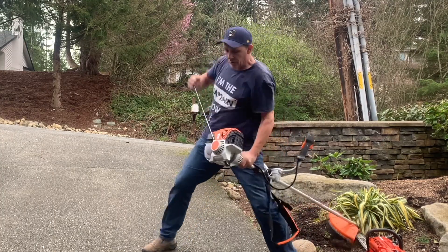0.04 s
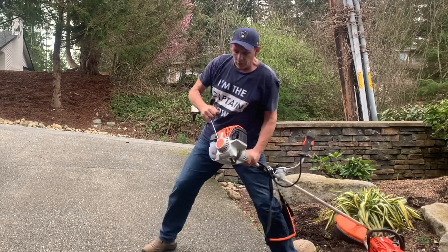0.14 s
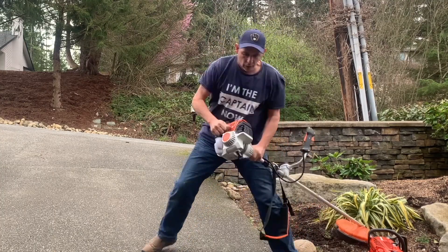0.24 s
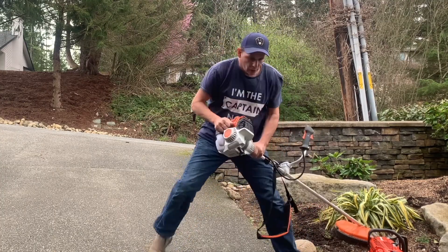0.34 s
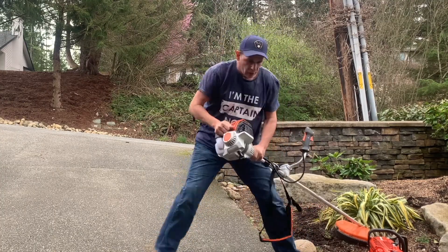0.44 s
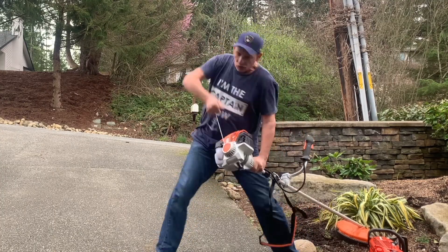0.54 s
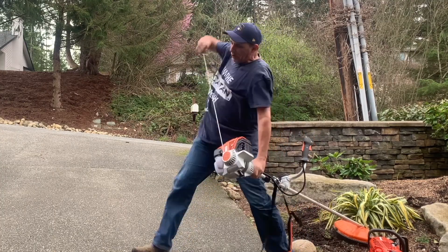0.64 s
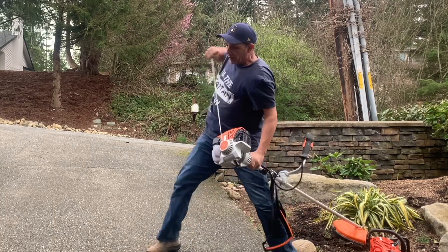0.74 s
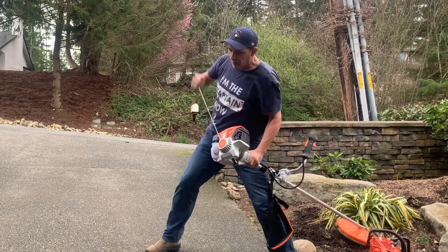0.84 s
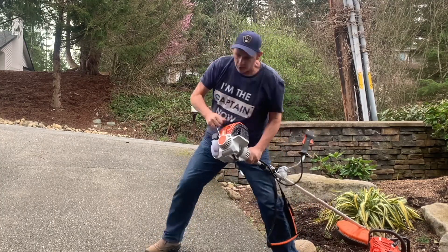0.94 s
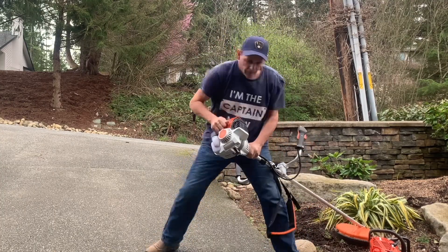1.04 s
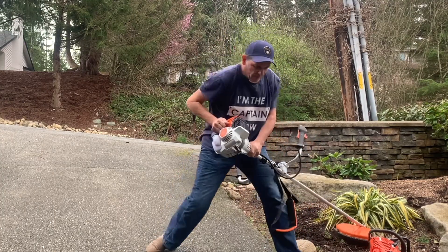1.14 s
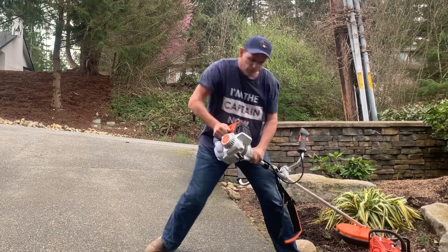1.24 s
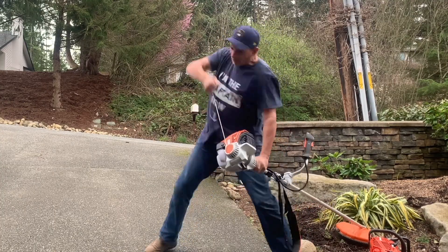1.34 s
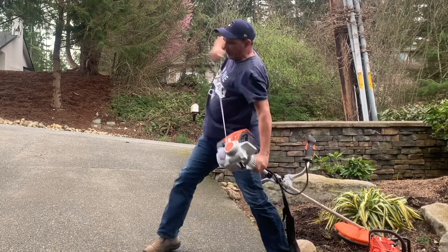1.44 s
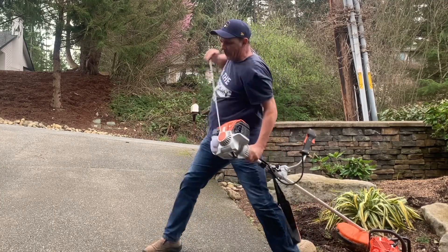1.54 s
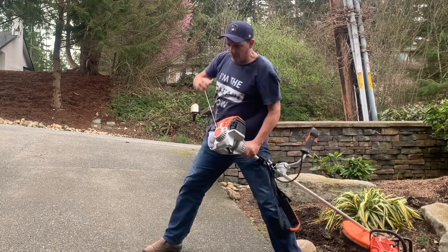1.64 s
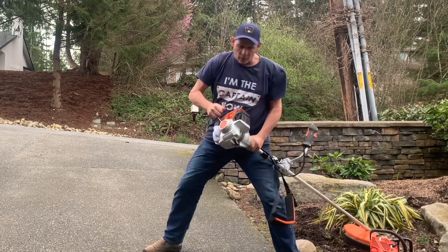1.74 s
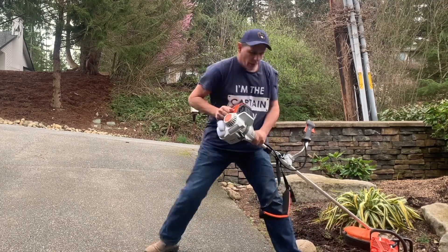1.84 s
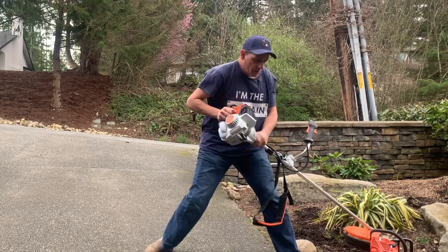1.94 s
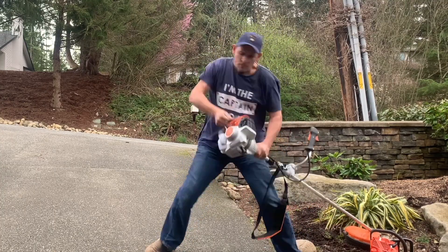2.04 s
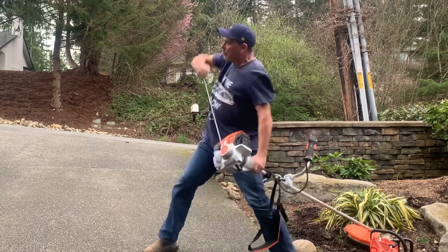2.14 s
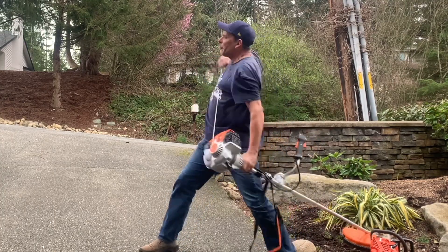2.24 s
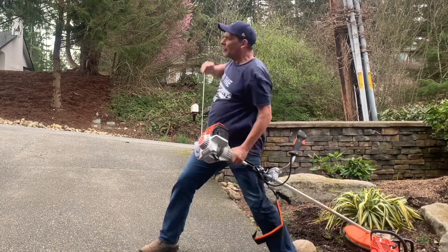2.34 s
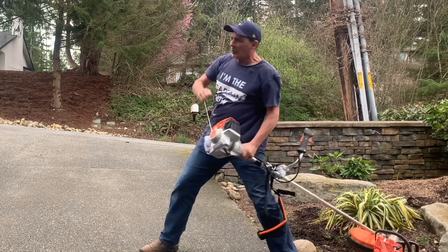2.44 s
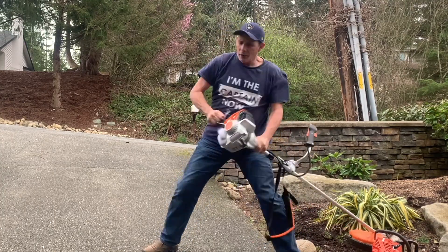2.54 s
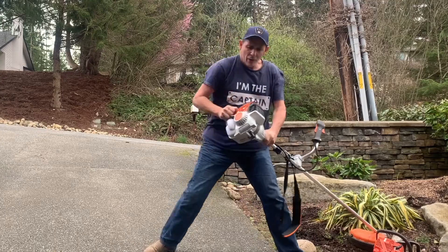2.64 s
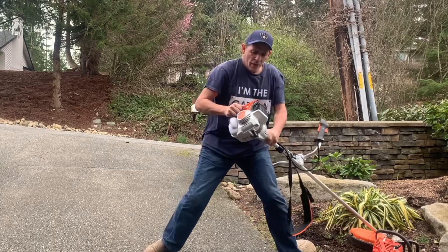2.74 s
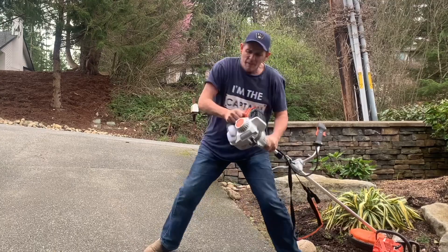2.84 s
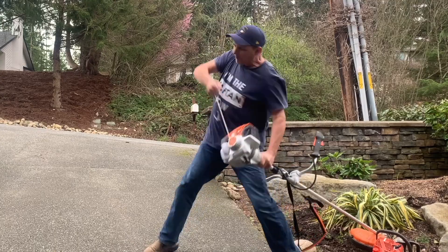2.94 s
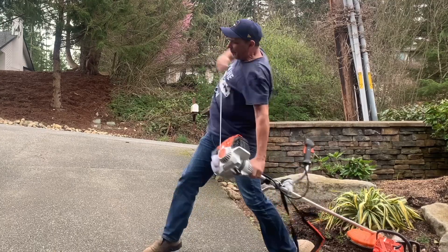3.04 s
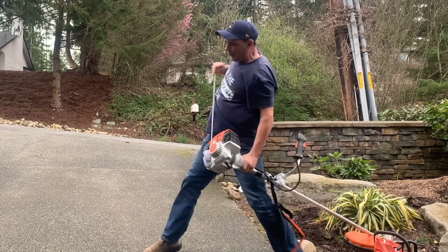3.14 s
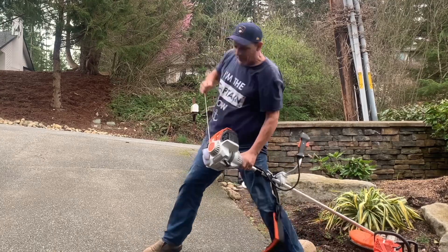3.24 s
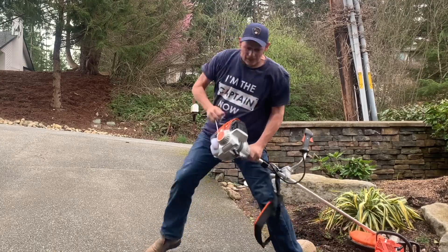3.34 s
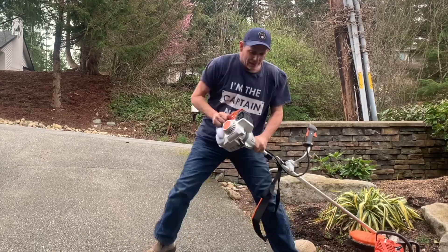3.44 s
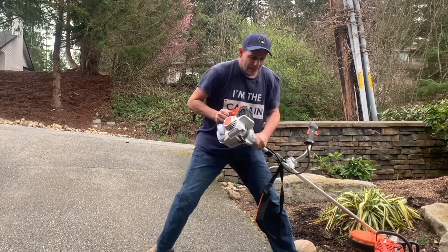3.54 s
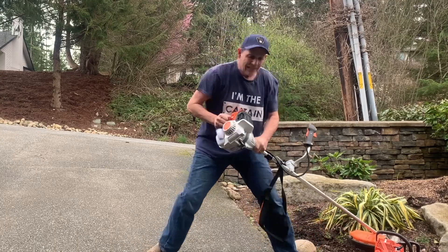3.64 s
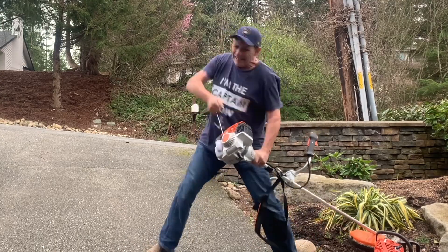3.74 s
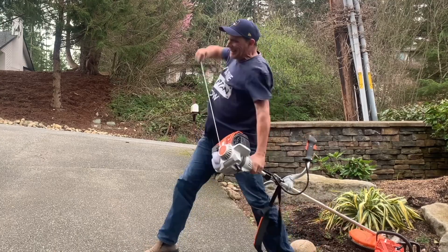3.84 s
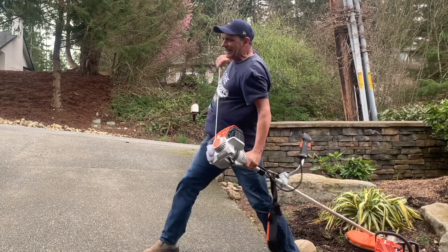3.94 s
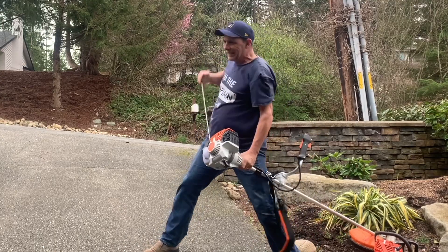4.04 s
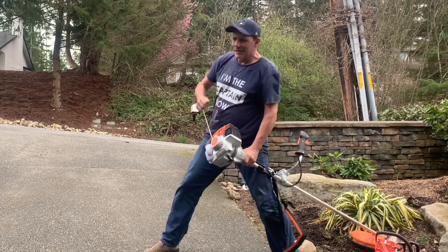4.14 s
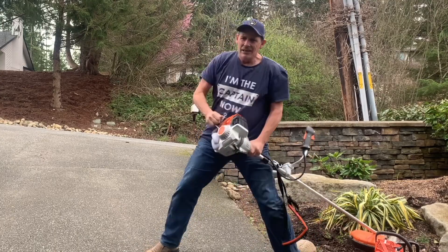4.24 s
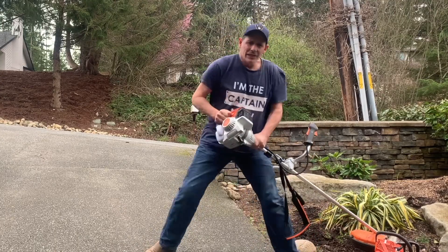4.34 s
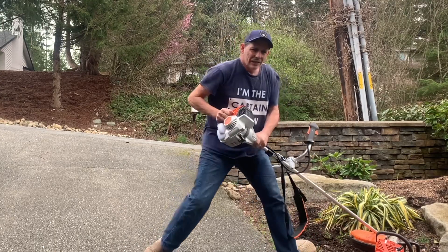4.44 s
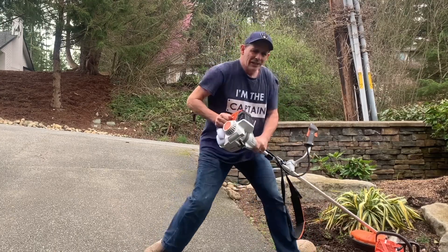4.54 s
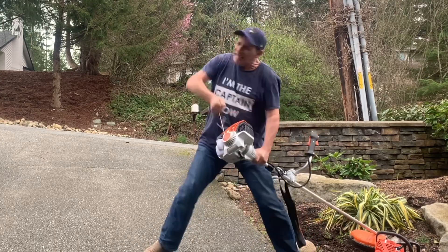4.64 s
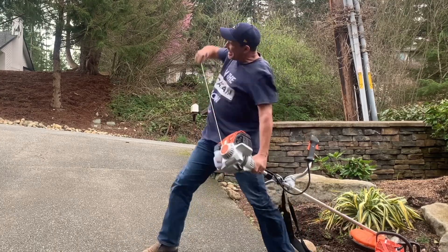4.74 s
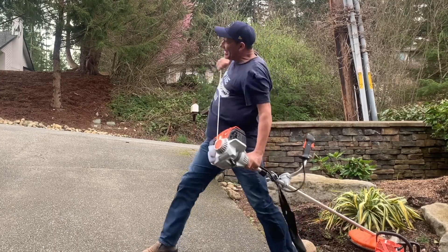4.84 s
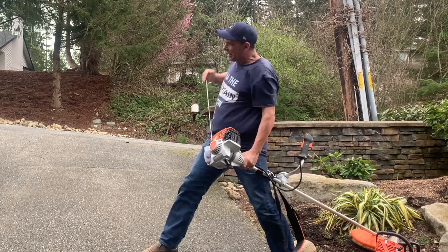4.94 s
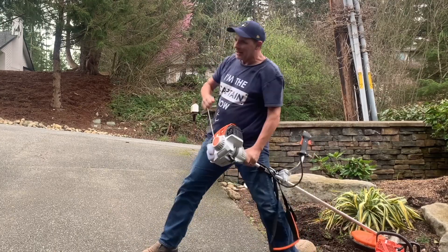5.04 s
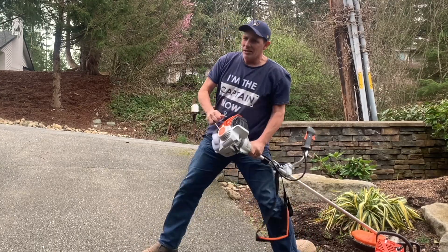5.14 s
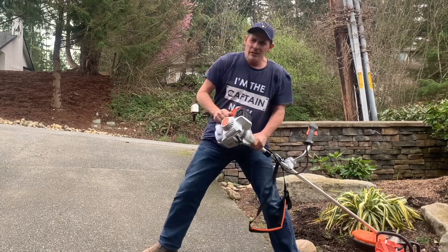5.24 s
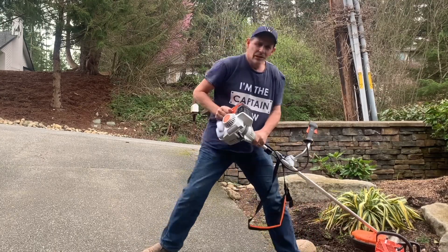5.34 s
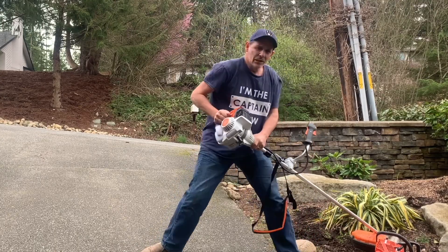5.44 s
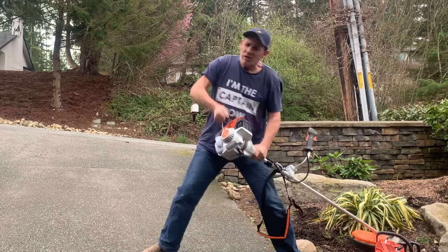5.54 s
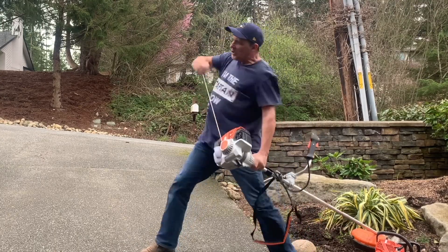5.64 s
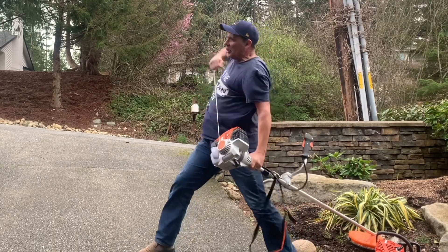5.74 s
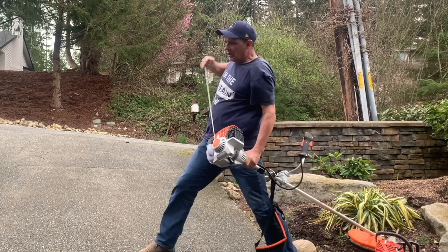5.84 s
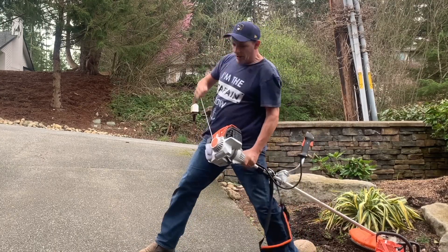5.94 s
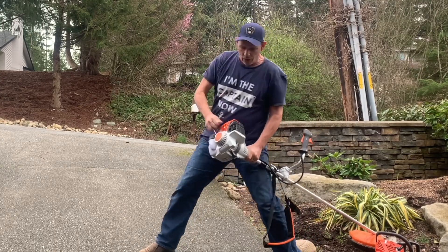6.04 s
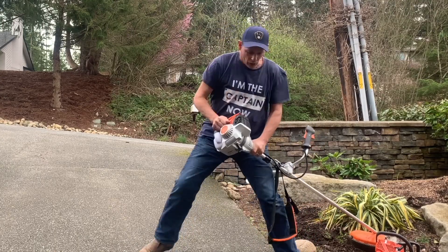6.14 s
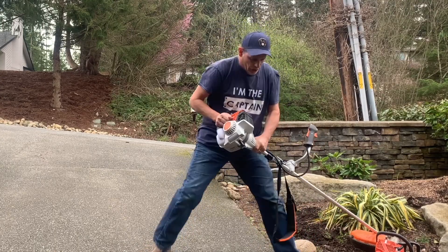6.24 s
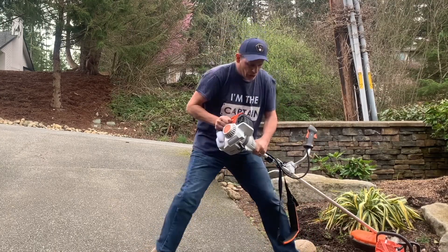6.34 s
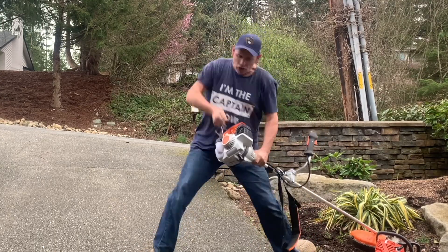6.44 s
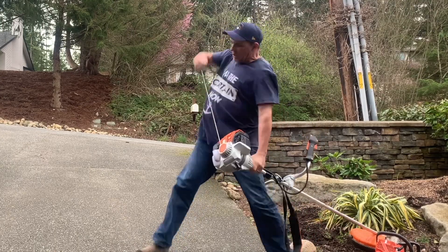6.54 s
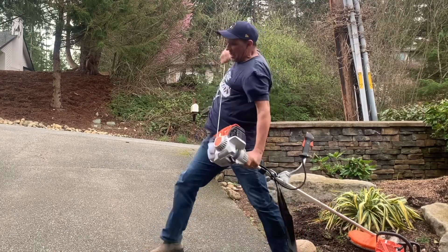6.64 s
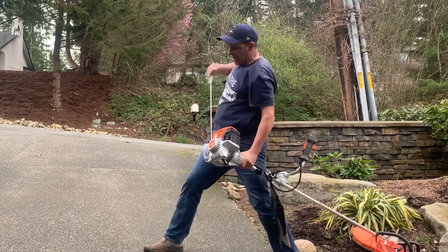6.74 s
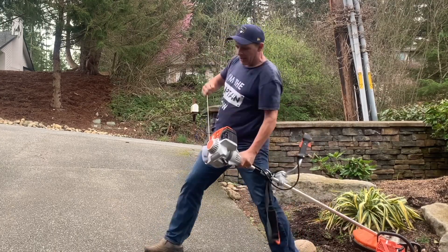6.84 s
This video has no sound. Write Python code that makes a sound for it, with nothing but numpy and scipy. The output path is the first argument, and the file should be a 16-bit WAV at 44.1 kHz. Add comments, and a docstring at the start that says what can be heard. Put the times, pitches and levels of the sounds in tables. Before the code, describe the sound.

A small two-stroke engine's pull starter is yanked eight times, each with clack, brief puffing crank, metallic ring and rattling rewind, never starting.

```python
"""On a driveway in quiet air: a small two-stroke trimmer engine is pulled over eight times and never starts.
A rewind is already under way at the start. In each pull the starter pawl catches, the piston puffs, parts rattle
in the plastic housing, the pawl flies free and rings the flywheel, the rope rewinds with a hiss and the grip knocks
home. Blows ring tuned modes; steady motion is uneven noise through resonances.
Two microphone ports hear the direct sound and the scatter from ground, wall and body."""
import sys
import numpy as np
from scipy import signal
from scipy.fft import rfft, irfft, next_fast_len
from scipy.io import wavfile
from scipy.ndimage import uniform_filter1d, map_coordinates

SR = 44100
rng = np.random.default_rng(int(sys.argv[2]) if len(sys.argv) > 2 else 0)


def persist_wave(psi):
    """Save psi, clipped to +-1, as 16-bit WAV."""
    counts = np.round(np.clip(psi, -1, 1) * 32767).astype(np.int16)
    wavfile.write(sys.argv[1], SR, np.atleast_2d(counts).T)


N = 303408  # samples


def undb(db):
    """Decibels to gain."""
    return 10 ** (np.asarray(db) / 20)


def unit(x):
    """Scale to rms 1."""
    return x / np.sqrt(np.mean(x ** 2))


def resonate(x, peaks):
    """Parallel resonances as band-passes of alternating sign, scaled together to rms 1."""
    total = 0
    for k, (hz, width_hz, db) in enumerate(peaks):
        band = signal.lfilter(*signal.iirpeak(hz, hz / width_hz, SR), x)
        total = total + (-1) ** k * undb(db) * band
    return unit(total)


def colour(x, points):
    """Shape a spectrum through (f/Hz, level/dB) points, straight over log frequency."""
    hz, db = np.transpose(points)
    f = np.maximum(np.fft.rfftfreq(x.shape[-1], 1 / SR), 1)
    gain = undb(np.interp(np.log(f), np.log(hz), db))
    return irfft(rfft(x) * gain, x.shape[-1])


def grit(per_s, spread_db, smooth):
    """Random ticks of very uneven size, as of loose contacts, over a share of smooth noise."""
    when, size, sign = rng.random((3, N))
    tick_gain = undb(-spread_db * np.log(size + .03))
    ticks = (when < per_s / SR) * tick_gain * (sign - .5)
    return unit(ticks) + smooth * rng.standard_normal(N)


def wander(per_s):
    """A slow random curve: held random values, smoothed over one hold."""
    k = int(SR / per_s)
    held = np.repeat(rng.standard_normal(N // k + 1), k)
    return uniform_filter1d(held, k)[:N]


def flicker(per_s, db):
    """A gain that wanders in dB."""
    return undb(db * wander(per_s))


# spectrum shape of the distant air: f/Hz, level/dB per Hz
AIR_SPECTRUM = [(25, -36), (60, 8), (163, -2), (600, -21), (1310, -21), (5160, -33), (9000, -47.5),
                (16500, -49)]
AIR_DB = -58.5  # rms before the driveway's scatter


def air():
    """Distant wind and road murmur: steady noise, strongest in the bass."""
    return undb(AIR_DB) * unit(colour(rng.standard_normal(N), AIR_SPECTRUM))


# scatter from ground, wall and body: f/Hz, level/dB against direct
SCATTER_SPECTRUM = [(50, -15), (300, -4), (1500, -3), (3500, 2), (5000, 0), (6500, -5), (16000, -8)]
SCATTER_T60_S = .045
# delay of the left microphone port behind the right: f/Hz, lag/rad
LEFT_PORT_LAG = [(0, 0), (1500, .2), (6100, .3), (15750, 12.7), (22050, 20.8)]


def driveway(x):
    """Direct sound reaches the two ports with a treble lag; scatter differs at each and shifts as the unit swings."""
    size = next_fast_len(N + SR // 2)
    lag = np.interp(np.fft.rfftfreq(size, 1 / SR), *np.transpose(LEFT_PORT_LAG))
    t = np.arange(SR // 8) / SR
    # two sets of paths, each to two ports; nothing returns in the first 1.5 ms
    scatter = rng.standard_normal((2, 2, len(t))) * undb(-60 * t / SCATTER_T60_S) * (t > .0015)
    energy = np.sum(scatter ** 2, axis=2, keepdims=True)
    scatter = colour(scatter / np.sqrt(energy), SCATTER_SPECTRUM)
    swing = 2 * np.pi * 2.3 * np.arange(N) / SR  # 2.3 swings a second
    out = rfft(x, size) * np.exp(.5j * np.array([-lag, lag]))
    for share, paths in zip((np.cos(swing), np.sin(swing)), scatter):
        out = out + rfft(x * share, size) * rfft(paths, size)
    return irfft(out, size)[:, :N]


# faint narrow-band sounds between pulls, whistling creaks and a knock's short blur at 1.74 s:
# start t/s, end t/s, f/Hz, width/Hz, level/dB
CREAKS_AND_BLUR = [(1.738, 1.765, 1600, 250, -50), (1.738, 1.765, 720, 200, -44),
                   (5.3, 5.5, 1700, 110, -57), (6.32, 6.4, 1420, 120, -53)]


def creaks_and_blur():
    """Faint whistling creaks and a knock's short blur: noise through the same narrow resonance twice."""
    t = np.arange(N) / SR
    out = np.zeros(N)
    for start, end, hz, width_hz, db in CREAKS_AND_BLUR:
        peak = [(hz, width_hz, 0)]
        narrow = resonate(resonate(rng.standard_normal(N), peak), peak)
        swell = np.interp(t, [start - .01, start + .005, end - .005, end + .01], [0, 1, 1, 0])
        out += undb(db) * swell * narrow
    return out


# housing modes from dull to bright, each detuned a little at every blow:
# f/Hz, t60/s, level/dB at the catch, level/dB at the pawl, level/dB at the grip
HOLLOW_MODES = [(480, .03, -12, -3, -4), (550, .035, -8, 2, -2), (620, .022, -8, -6, 0),
                (690, .035, 3, -3, -1)]
CLACK_MODES = [(990, .025, -4, -20, 0), (1100, .025, -2, -15, 0), (1230, .028, 2, -4, -4),
               (1330, .035, -3, 2, -6), (1560, .02, -8, -10, -3)]
SNAP_MODES = [(1990, .012, -7, -10, -8), (2200, .012, -9, -12, -10), (2500, .008, -16, -11, -11),
              (3150, .012, -17, -17, -19), (3600, .015, -18, -18, -21), (4200, .01, -17, -15, -21),
              (5000, .008, -22, -18, -24)]
CRACK_MODES = [(6000, .008, 2, 3, 0), (6600, .007, 4, 3, 0), (7400, .006, 7, 8, 6), (8300, .005, 6, 7, 5),
               (9600, .004, 8, 8, 8), (10400, .004, 7, 7, 7), (11300, .004, 7, 6, 7),
               (12200, .004, 4, 4, 4), (15000, .004, 5, 4, 5)]
AT_CATCH, AT_PAWL, AT_GRIP = 0, 1, 2
HOLLOW_WAIT_S = .002  # the shell answers a blow a moment late


def add_blow(out, s, db, modes, contact_s, scuff):
    """A noisy contact swells and fades around s and rings modes of chance detuning and strength."""
    t = np.arange(2600) / SR
    hz, mode_db, t60 = np.transpose(modes)[:, :, None]
    chance = rng.standard_normal((2, len(modes), 1))
    decay = undb(mode_db + 2 * chance[0] - 60 * t / t60)
    detuned_hz = hz * (1 + .025 * chance[1])
    ring = np.sum(decay * np.sin(2 * np.pi * detuned_hz * t), axis=0)
    since = t[:1300] - .012
    scuffing = (since > -.006) * (since < 0)  # parts scuff together first
    contact = np.exp(-(since / contact_s) ** 2) + scuff * scuffing
    sound = signal.fftconvolve(ring, contact * rng.standard_normal(1300))[:len(t)]
    loudest = np.sqrt(uniform_filter1d(sound ** 2, size=200).max())  # short-term rms
    i = int((s - .012) * SR)
    out[i:i + len(t)] += (sound * undb(db) / loudest)[:N - i]


def blows(times, levels, spots, contact_s, late_s, scuff):
    """Every blow rings all four families of housing modes, weighted by the spot it strikes."""
    families = (HOLLOW_MODES, CLACK_MODES, SNAP_MODES, CRACK_MODES)
    out = np.zeros(N)
    for s, row, spot in zip(times, levels, spots):
        if s + .02 >= N / SR:
            continue
        for db, modes, wait_s in zip(row, families, (HOLLOW_WAIT_S, 0, 0, 0)):
            struck = np.array(modes)[:, [0, 2 + spot, 1]]
            add_blow(out, s + late_s + wait_s, db, struck, contact_s, scuff)
    # blows keep only the sound above about 420 Hz
    return signal.sosfilt(signal.butter(4, 420, "highpass", fs=SR, output="sos"), out)


# every pull, used by all the starter sounds below; the first is already rewinding:
# catch t/s, catch level/dB, pawl free t/s, pawl level/dB, pawl treble/dB, catch hollowness/dB,
# flywheel ring level/dB, effort/dB, compression/dB, rewind thump/dB, rope home t/s, rewind level/dB
STARTER_PULLS = [(-.32, -15, -.17, -18, 0, 0, -30, -3, -6, 0, .12, -1),
                 (.4632, -15, .608, -21, 1, 2, -26.5, -3, -1, -12, .88, -2),
                 (1.2333, -15, 1.3773, -17, -5, -6, -30, -3, -4, -5, 1.66, -2.5),
                 (2.01, -15, 2.1482, -18, 0, -10, -28.5, -2, -4, -1, 2.41, 0),
                 (2.8427, -11, 2.9854, -14, -3, -5, -27, 1, 2.5, 6, 3.3, -.5),
                 (3.6773, -10, 3.8227, -14, -1, 1, -24.5, 1, 1, 1, 4.15, 0),
                 (4.58, -11, 4.7332, -14, -2, -8, -36.5, 0, 2, 4, 5.03, 1.5),
                 (5.5128, -11, 5.6645, -15, -2, 0, -23.5, 0, 0, -2, 5.98, -.5),
                 (6.4034, -13, 6.5478, -12, -2, -2, -38, 1, -1, -3, 6.87, -1)]
# loose parts and grip knocking: t/s, hollow level/dB, clack level/dB, snap level/dB, crack level/dB
CLEAR_KNOCKS = [(0.012, -42.0, -40.0, -47.0, -40.0), (0.0912, -42.0, -39.0, -45.0, -41.0),
                (0.1336, -44.0, -47.0, -51.0, -51.0), (0.2324, -43.0, -46.0, -50.0, -70),
                (0.3235, -40.0, -38.0, -48.0, -54.0), (0.4165, -43.0, -40.0, -46.0, -69.0),
                (0.5257, -25.0, -36.0, -50.0, -37.0), (0.588, -25.0, -33.0, -35.0, -50.0),
                (0.6614, -47.0, -49.0, -54.0, -51.0), (0.7484, -51.0, -54.0, -58.0, -59.0),
                (0.8749, -36.0, -37.0, -43.0, -43.0), (0.9344, -34.0, -59.0, -59.0, -64.0),
                (1.032, -41.0, -41.0, -55.0, -70), (1.2964, -26.0, -46.0, -50.0, -43.0),
                (1.315, -26, -32, -38, -46), (1.3579, -28.0, -26.0, -45.0, -48.0),
                (1.4661, -33.0, -32.0, -32.0, -59.0), (1.4846, -43.0, -50.0, -56.0, -40.0),
                (1.5324, -40.0, -54.0, -57.0, -38.0), (1.6087, -41.0, -35.0, -41.0, -49.0),
                (1.6526, -39.0, -35.0, -42.0, -40.0), (1.7425, -38.0, -44.0, -53.0, -70),
                (1.7956, -49.0, -52.0, -49.0, -45.0), (1.8516, -41.0, -47.0, -46.0, -65.0),
                (2.0608, -29.0, -33.0, -50.0, -52.0), (2.229, -33.0, -30.0, -44.0, -41.0),
                (2.252, -40.0, -50.0, -51.0, -37.0), (2.3258, -26.0, -32.0, -32.0, -41.0),
                (2.3613, -34.0, -27.0, -31.0, -44.0), (2.4814, -27.0, -33.0, -40.0, -42.0),
                (2.5296, -29.0, -42.0, -54.0, -66.0), (2.5746, -35.0, -62.0, -51.0, -52.0),
                (2.6184, -33.0, -35.0, -54.0, -58.0), (2.7377, -34.0, -27.0, -38.0, -55.0),
                (2.799, -47.0, -44.0, -66.0, -70), (2.8903, -21.0, -43.0, -47.0, -48.0),
                (2.912, -23, -36, -44, -48), (2.926, -34, -26, -33, -42),
                (2.948, -20.0, -23.0, -43.0, -45.0), (2.9644, -35.0, -16.0, -42.0, -45.0),
                (3.0443, -24.0, -30.0, -48.0, -52.0), (3.0664, -25.0, -30.0, -25.0, -44.0),
                (3.1174, -31.0, -34.0, -46.0, -50.0), (3.1547, -47.0, -50.0, -43.0, -47.0),
                (3.1834, -32.0, -43.0, -40.0, -46.0), (3.1961, -34.0, -36.0, -39.0, -44.0),
                (3.2534, -30.0, -43.0, -48.0, -51.0), (3.2687, -49.0, -36.0, -33.0, -59.0),
                (3.3535, -33.0, -34.0, -46.0, -50.0), (3.3745, -27.0, -34.0, -37.0, -50.0),
                (3.477, -42.0, -36.0, -58.0, -70), (3.5131, -38.0, -37.0, -51.0, -64.0),
                (3.5518, -39.0, -35.0, -38.0, -58.0), (3.7392, -21.0, -26.0, -45.0, -35.0),
                (3.76, -25.0, -29.0, -32.0, -37.0), (3.773, -23.0, -25.0, -40.0, -46.0),
                (3.8008, -24.0, -20.0, -33.0, -46.0), (3.846, -40.0, -23.0, -33.0, -37.0),
                (3.877, -29.0, -26.0, -45.0, -52.0), (3.919, -44.0, -29.0, -52.0, -55.0),
                (3.9454, -40, -36, -42, -36), (4.0302, -30.0, -35.0, -35.0, -48.0),
                (4.1044, -40, -36, -44, -41), (4.197, -31.0, -38.0, -39.0, -49.0),
                (4.2045, -50, -55, -46, -42), (4.2574, -33.0, -27.0, -41.0, -56.0),
                (4.3036, -50, -50, -50, -47), (4.3794, -60, -55, -56, -52),
                (4.416, -50.0, -41.0, -44.0, -70), (4.6525, -24.0, -32.0, -42.0, -37.0),
                (4.6804, -20.0, -31.0, -35.0, -46.0), (4.79, -25.0, -29.0, -34.0, -47.0),
                (4.9207, -27.0, -32.0, -33.0, -43.0), (5.013, -37.0, -35.0, -45.0, -49.0),
                (5.0365, -37.0, -38.0, -41.0, -57.0), (5.1295, -29.0, -32.0, -34.0, -55.0),
                (5.177, -44.0, -44.0, -50.0, -70), (5.2013, -27.0, -23.0, -37.0, -55.0),
                (5.2247, -43.0, -41.0, -42.0, -64.0), (5.3476, -44.0, -36.0, -46.0, -57.0),
                (5.503, -48, -44, -42, -44), (5.5543, -26.0, -44.0, -47.0, -48.0),
                (5.62, -25.0, -23.0, -31.0, -45.0), (5.745, -28, -36, -40, -50),
                (5.828, -40, -35, -44, -50), (5.865, -32, -38, -40, -50),
                (5.9294, -52.0, -36.0, -36.0, -37.0), (5.9676, -45.0, -32.0, -44.0, -47.0),
                (6.074, -36.0, -28.0, -36.0, -53.0), (6.1345, -42.0, -45, -50.0, -41),
                (6.217, -43.0, -36.0, -41.0, -52.0), (6.232, -60.0, -55.0, -52, -36),
                (6.283, -52.0, -64.0, -48.0, -44), (6.4562, -22.0, -36.0, -47.0, -49.0),
                (6.4903, -25.0, -29.0, -36.0, -36.0), (6.508, -24, -33, -30, -42),
                (6.5688, -21.0, -16.0, -41.0, -37.0), (6.6933, -26.0, -29.0, -54.0, -49.0),
                (6.7484, -34.0, -34.0, -32.0, -49.0), (6.8543, -33.0, -33.0, -40.0, -46.0)]
# hollow, clack, snap, crack in dB against the blow, for catch, pawl and chance knocks
CATCH_MIX_DB, RELEASE_MIX_DB, KNOCK_MIX_DB = [-4, 2, -9, -2], [-9, 1, -16, -2], [0, 0, -6, -14]
RATTLE_DB, RATTLE_SPREAD_DB = -47, 5  # chance knocks, before family mix and rewind level; spread either way
SHAKEN_S = .12  # knocks ring like the pawl from the catch until this long after it frees


def knocks(count):
    """Loose parts and grip strike the housing: clear knocks, and a few small chance ones in every rewind."""
    catch_s, _, free_s, *_, home_s, rewind_db = np.transpose(STARTER_PULLS[1:])[:, :, None]
    chance = rng.random((len(free_s), count, 5))
    small_s = free_s + (home_s - free_s) * chance[..., 0]
    spread_db = RATTLE_SPREAD_DB * (2 * chance[..., 1:] - 1)
    small_db = RATTLE_DB + rewind_db[..., None] + KNOCK_MIX_DB + spread_db
    clear = np.array(CLEAR_KNOCKS)
    s = np.r_[clear[:, 0], small_s.ravel()]
    levels = np.r_[clear[:, 1:], small_db.reshape(-1, 4)]
    shaken = np.any((s > catch_s) & (s < free_s + SHAKEN_S), axis=0)
    spots = np.where(shaken, AT_PAWL, AT_GRIP)
    return blows(s, levels, spots, contact_s=.0015, late_s=.0017, scuff=.06)


# settled flywheel tones: f/Hz, level/dB, t60/s before the extra early fade
FLYWHEEL_TONES = [(5925, -6, .3), (6030, 0, .6)]
SAG_SHARE, SAG_S = .02, .16  # the ring starts this share sharp and settles


def flywheel():
    """The freed pawl strikes the metal flywheel: a close pair of high tones beats and sags as the wheel slows."""
    t = np.arange(SR // 2) / SR
    bent = t + SAG_SHARE * SAG_S * (1 - np.exp(-t / SAG_S))
    swell = 1 - np.exp(-t / .002)
    early_fade_db = -4.5 + 3.5 * np.exp(-t / .04)
    out = np.zeros(N)
    for _, _, free_s, _, _, _, db, *_ in STARTER_PULLS[1:]:
        ring = 0
        for hz, tone_db, t60 in FLYWHEEL_TONES:
            tone = np.sin(2 * np.pi * (hz * bent + rng.random()))
            ring = ring + undb(tone_db - 60 * t / t60) * tone
        i = int((free_s + .001) * SR)
        out[i:i + len(t)] += (undb(db + early_fade_db) * ring * swell)[:N - i]
    return out * flicker(50, 3.0)


# the five rows of the next three tables are the layers puffs, low body, high body, scrape, hiss;
# their levels come before each pull's own and the layer trims
# engine turning: level/dB at the catch, rise t/s, level/dB risen, level/dB when the pawl frees,
# hold t/s, coast fall/(dB/s)
ENGINE_TURNING = [(-60, .06, -31.5, -30.5, .04, 97), (-46, .08, -35, -38, .04, 110),
                  (-45, .08, -39, -34, .015, 200), (-51, .09, -42.5, -43, .02, 180),
                  (-52, .085, -47, -47, .02, 220)]
TAKE_UP_S, TAKE_UP_DB = .013, -15  # the rope tightens just before the catch
# rope running back: level/dB at first, level/dB on reaching home, fall/(dB/s)
ROPE_REWIND = [(-53, -57, 50), (-44, -48, 110), (-47, -47.5, 140), (-53, -51.5, 150), (-61.5, -57.5, 225)]
REWIND_RISE_S = .05
SETTLE_S, SETTLE_SHARE = .08, .45  # after this long at home the fall slows to this share
# each layer at rest: level/dB
REST_LEVELS = [-67, -74, -82, -87, -94]
# the unit shifts in the hands between pulls: start t/s, loudest t/s, end t/s,
# thump level/dB, rattle level/dB, scrape level/dB, hiss level/dB
HAND_SHIFTS = [(.322, .335, .42, -46, -43, -50, -57), (1.73, 1.84, 1.89, -54, -61, -59, -64),
               (1.9, 1.94, 1.97, -58, -63, -73, -90), (2.44, 2.52, 2.63, -49, -57, -62, -64),
               (2.64, 2.76, 2.84, -53, -57, -65, -89), (3.34, 3.38, 3.42, -47, -53, -56, -66),
               (3.44, 3.53, 3.62, -47, -58, -59, -88), (4.2, 4.27, 4.36, -52, -53, -59, -70),
               (4.36, 4.44, 4.54, -59, -71, -67, -90), (5.12, 5.2, 5.28, -58, -53, -58, -83),
               (5.28, 5.34, 5.49, -54, -61, -63, -80), (6.11, 6.2, 6.26, -48, -48, -50, -50),
               (6.28, 6.37, 6.41, -53, -55, -60, -70)]
SHIFT_EDGE_DB = -8  # at start and end, against the loudest
SHIFT_RISE_DB_PER_S, SHIFT_FADE_DB_PER_S = 700, 400  # outside start and end


def motion(layer):
    """Gain of one layer: cranking, rewinding, shifting in the hands and rest add in power."""
    t = np.arange(0, N / SR, .001)
    first_db, rise_s, risen_db, free_db, hold_s, coast = ENGINE_TURNING[layer]
    start_db, home_db, fall = ROPE_REWIND[layer]
    settled_db = home_db - fall * SETTLE_S
    crank_points = [first_db + TAKE_UP_DB, first_db, risen_db, free_db, free_db, free_db - coast]
    rewind_points = [start_db - 20, start_db, home_db, settled_db, settled_db - fall * SETTLE_SHARE]
    shift_points = [SHIFT_EDGE_DB - SHIFT_RISE_DB_PER_S, SHIFT_EDGE_DB, 0,
                    SHIFT_EDGE_DB, SHIFT_EDGE_DB - SHIFT_FADE_DB_PER_S]
    parts = [np.full(len(t), 1. * REST_LEVELS[layer])]
    for catch, _, free, *_, effort_db, compression_db, thump_db, home, rewind_db in STARTER_PULLS:
        still = free + hold_s
        crank_s = [catch - TAKE_UP_S, catch, catch + rise_s, free, still, still + 1]
        crank_db = effort_db if layer else compression_db  # compression sets the puffs
        parts.append(crank_db + np.interp(t, crank_s, crank_points, left=-200))  # left: silence
        settled = home + SETTLE_S
        rewind_s = [free, free + REWIND_RISE_S, home, settled, settled + 1]
        run_db = rewind_db if layer else thump_db
        parts.append(run_db + np.interp(t, rewind_s, rewind_points, left=-200))
    for start, top, end, thump_db, rattle_db, scrape_db, hiss_db in HAND_SHIFTS:
        db = (thump_db, rattle_db, rattle_db, scrape_db, hiss_db)[layer]
        parts.append(db + np.interp(t, [start - 1, start, top, end, end + 1], shift_points))
    gain = np.sqrt(np.sum(undb(parts) ** 2, axis=0))
    return np.interp(np.arange(N) / SR, t, gain)


DRIFT_SHARE, DRIFT_PER_S = .03, 14  # rms speed change; new random values a second


def drift(x):
    """Housing resonances wander in pitch as the grip changes: x is read at an uneven speed."""
    lag = np.cumsum(DRIFT_SHARE * unit(wander(DRIFT_PER_S)))
    lag = lag - uniform_filter1d(lag, size=SR // 4)  # keep events near their own times
    return map_coordinates(x, [np.arange(N) + lag], order=1, mode="mirror")


# resonances that steady motion excites: f/Hz, width/Hz, level/dB within the group
MUFFLER_PEAKS = [(73, 69, -8), (106.6, 17, -3.5), (158, 27.7, -1), (261.7, 60, -3), (328, 174, -10.5)]
LOW_BODY_PEAKS = [(496.5, 152, -5.5), (563.7, 103, 0.5), (662, 147, -4)]
HIGH_BODY_PEAKS = [(1080, 160, -12), (1310, 220, 0), (1560, 220, -11)]
SCRAPE_PEAKS = [(2100, 800, 0), (3200, 900, -4.5), (4100, 600, -3.5), (5100, 900, -11)]
HISS_PEAKS = [(6200, 900, -2), (7500, 900, 4.5), (9530, 870, 2.5), (11400, 2400, -1), (15000, 1400, -4)]
TURNS_HZ = 23.55  # nominal crank turns a second; the speed wanders
PISTON_SMOOTH, PISTON_SHARE = .8, .3  # steady part of the rattle; decay of each jolt in half turns


def patchy():
    """Each part of the rattle comes and goes on its own."""
    return flicker(22, 2.0)


def cranking():
    """Puffs once a turn in the muffler, loose parts ticking in the housing, rope and spring rubbing."""
    puff_gain, low_gain, high_gain, scrape_gain, hiss_gain = map(motion, range(5))
    turn = np.cumsum(TURNS_HZ / SR * flicker(6, 1.8)) % 1
    stroke = 1.35 + np.exp(-turn / .34)  # gas leaves in a gust after each compression
    shake = flicker(70, 2.2)  # the whole unit jolts in the hand
    puffs = resonate(stroke * grit(300, 1.2, 1.17), MUFFLER_PEAKS) * puff_gain
    jolt = PISTON_SMOOTH + np.exp(-(2 * turn % 1) / PISTON_SHARE)  # the piston turns round twice a turn
    low = drift(resonate(jolt * grit(500, 2.5, .9), LOW_BODY_PEAKS)) * low_gain * undb(6.0)
    shared = grit(400, 3.0, .5)  # ticks common to high body, scrape and hiss
    high = drift(resonate(jolt * shared, HIGH_BODY_PEAKS)) * high_gain * undb(3.5)
    rubbing = jolt * (.4 * shared + grit(1200, 2.3, 1.0))
    scrape = drift(resonate(rubbing, SCRAPE_PEAKS)) * scrape_gain * undb(4.0)
    hiss = resonate(.9 * shared + grit(1400, 3.5, 1.3), HISS_PEAKS) * hiss_gain * undb(12.0)
    parts = sum(part * patchy() for part in (low, high, scrape, hiss))
    return puffs + shake * parts


def pawl_catches():
    """The pawl catches: a short blow on the housing with its own hollowness in each pull."""
    s, db, _, _, _, hollow_db = np.transpose(STARTER_PULLS[1:])[:6]
    levels = db[:, None] + CATCH_MIX_DB + np.outer(hollow_db, [1, 0, 0, 0])
    spots = [AT_CATCH] * len(s)
    return undb(-5.0) * blows(s, levels, spots, contact_s=.0015, late_s=.0017, scuff=.12)


def pawl_releases():
    """The pawl flies free: a longer chattering blow on the housing with its own treble in each pull."""
    _, _, s, db, treble_db, _ = np.transpose(STARTER_PULLS[1:])[:6]
    levels = db[:, None] + RELEASE_MIX_DB + np.outer(treble_db, [0, 0, 0, 1])
    spots = [AT_PAWL] * len(s)
    return undb(-3.0) * blows(s, levels, spots, contact_s=.0078, late_s=.0068, scuff=.072)


DIP_HZ, DIP_WIDTH_HZ, DIP_SHARE = 870, 220, .5  # the ground's mirror image weakens this band


def scene():
    """Trimmer on the driveway over the quiet air."""
    hits = pawl_catches() + pawl_releases() + knocks(count=3)
    trimmer = cranking() + hits + flywheel() + creaks_and_blur()
    mirrored = signal.lfilter(*signal.iirpeak(DIP_HZ, DIP_HZ / DIP_WIDTH_HZ, SR), trimmer)
    return driveway(undb(-1.5) * (trimmer - DIP_SHARE * mirrored) + air())


def record(dry):
    """The microphone drops the deepest bass; the recorder cuts the top."""
    dry = signal.sosfilt(signal.butter(3, 42, "highpass", fs=SR, output="sos"), dry)
    top_hz = 15900
    return signal.sosfilt(signal.ellip(10, .2, 70, top_hz, fs=SR, output="sos"), dry)


dry = scene()
out = record(dry)
persist_wave(out)
```